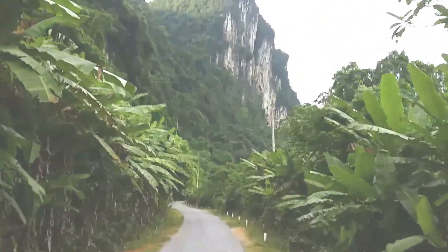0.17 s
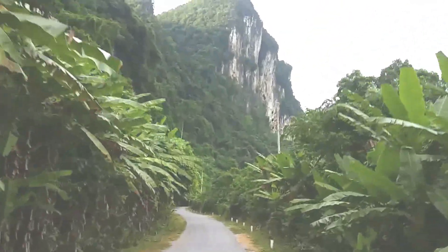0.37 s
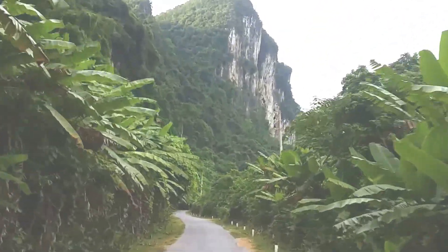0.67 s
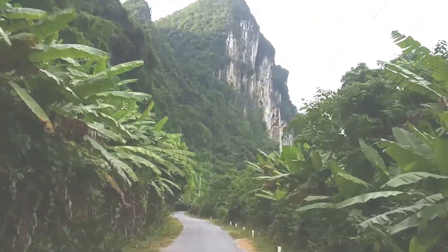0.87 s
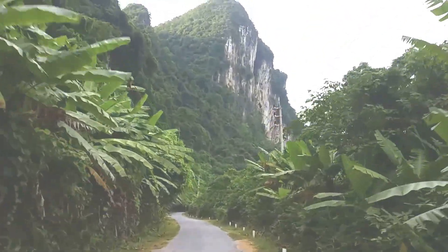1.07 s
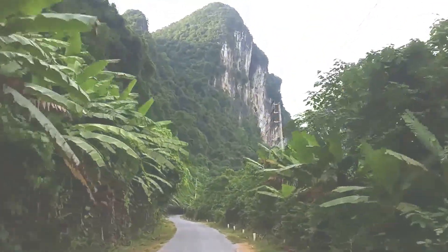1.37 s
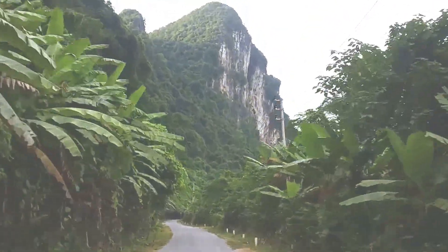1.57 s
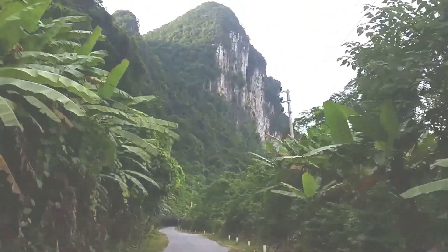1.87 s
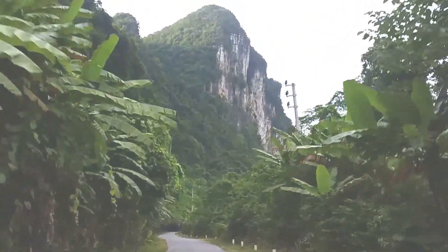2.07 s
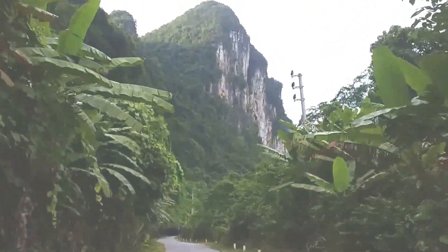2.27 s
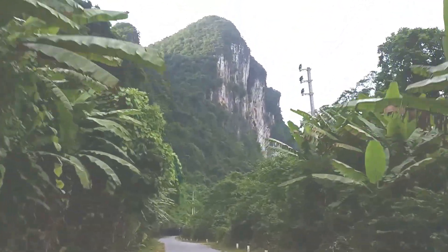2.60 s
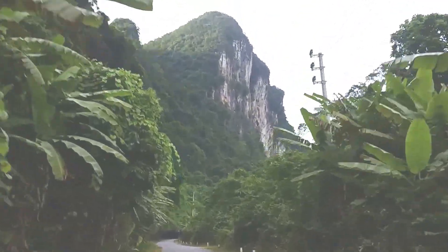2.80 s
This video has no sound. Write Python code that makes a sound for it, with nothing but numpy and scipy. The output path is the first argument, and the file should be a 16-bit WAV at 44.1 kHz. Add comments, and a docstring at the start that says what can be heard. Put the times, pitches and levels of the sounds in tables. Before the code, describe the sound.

Wind buffeting a microphone carried on a small motorbike along a country lane: low thumps, a wavering hollow howl and sharp slaps mostly on the left, with the engine humming steadily higher underneath.

```python
"""A small single-cylinder motorbike pulls away along a country lane; a two-port microphone faces the wind.
From the start eddies buffet each port, thumps hit the left one and a howl wanders over it with sharp slaps.
The firing rate climbs all the while. The howl sinks into a lull after one second, then returns higher,
with the gear whine at its clearest beside it; a tiny tick on the right follows, and the howl and slaps
last to the end. Wind is shaped noise, howl and engine are wavering tones, slaps and thumps are resonances."""
import sys
import numpy as np
from scipy import signal
from scipy.fft import rfft, irfft
from scipy.io import wavfile
from scipy.ndimage import uniform_filter1d, minimum_filter1d

SR = 44100
rng = np.random.default_rng(int(sys.argv[2]) if len(sys.argv) > 2 else 0)


def dump_mix(stems):
    """Bounce the given channels to the path in sys.argv[1] as a 16-bit WAV at rate SR."""
    frames = np.atleast_2d(stems).T  # one column per channel
    limited = np.clip(frames, -1, 1)  # hard clip at full scale
    pcm = np.round(limited * 32767).astype(np.int16)
    wavfile.write(sys.argv[1], SR, pcm)


N = 129654  # length in samples


def amp(db):
    """dB to gain."""
    return 10 ** (np.asarray(db) / 20)


def unit(x):
    """Scale to rms 1."""
    return x / np.sqrt(np.mean(np.abs(x) ** 2) + 1e-20)


def in_time(rows):
    """Columns of a table as curves over all samples; the first column is the time in seconds."""
    seconds, *columns = np.transpose(rows)
    return [np.interp(np.arange(N) / SR, seconds, column) for column in columns]


def at_hz(points, hz):
    """A spectrum read on a log-frequency axis."""
    points = np.array(points)
    return np.interp(np.log(hz), np.log(points[:, 0]), points[:, 1])


def drift(rate_hz):
    """Random wander of rms 1: noise through two equal low-pass poles at rate_hz."""
    step = 20  # computed at every 20th sample, lines between
    r = np.exp(-2 * np.pi * rate_hz * step / SR)
    noise = rng.standard_normal(N // step + 2002)
    slow = signal.lfilter([1], [1, -2 * r, r * r], noise)[2000:]  # drop the settling
    return np.interp(np.arange(N) / step, np.arange(len(slow)), unit(slow))


def noise_through(order, edges_hz, kind):
    """White noise through a Butterworth filter."""
    return smooth(rng.standard_normal(N), order, edges_hz, kind)


def smooth(x, order, edges_hz, kind="low"):
    """Butterworth filter, low-pass unless told otherwise."""
    return signal.sosfilt(signal.butter(order, edges_hz, kind, fs=SR, output="sos"), x)


def ring(start_s, peak_db, hz, t60_s):
    """One click sets a resonance ringing; it falls 60 dB in t60_s."""
    click = np.full(N, 1e-18)
    click[int(start_s * SR)] = amp(peak_db)
    r, w = amp(-60 / (t60_s * SR)), 2 * np.pi * hz / SR
    return signal.lfilter([0, np.sin(w)], [1, -2 * r * np.cos(w), r * r], click)


HOWL_WANDER, WANDER_HZ = 0.0447, 45.3  # pitch spread as a share at full strength, its speed
HOWL_FULL_DB = -18.5  # table level that counts as full strength
HOWL_STEADY = 0.5  # steady part beside the random lumps at full strength; larger when weak
HOWL_WIDTH_HZ, LUMP_DB, LUMP_HZ = 55, .7, 40  # lump speed; extra level wander and its speed
SKIRT_WIDTH_HZ, SKIRT_DB = 400, -2.5  # rough noise around the pitch, level at full strength
ROAR_LUMP_DB, CRACKLE_DB, CRACKLE_HZ = 2, 4.5, 150  # roar shares the lumps and breaks into quick bursts
HOWL_TRIM_DB, ROAR_TRIM_DB, HOWL_RIGHT_DB = 5, 1.5, -38
# Band of the roar. Lower edge, upper edge [Hz].
ROAR_BAND = [530, 1890]
# Overtones of the howl. Each row: multiple of the pitch, level in dB before the lumps and scaling.
OVERTONES = [(2, -20.5), (3, -38), (4, -58)]
# Howl across the left port, into the lull.
# Each row: time in seconds, level in dB before trim, pitch in Hz, broad roar level in dB before trim.
HOWL_TO_LULL = [(0.0, -28, 700, -43), (0.014, -40.5, 672.7, -36), (0.062, -29.5, 594.5, -30.5),
                (0.154, -26.5, 830, -26), (0.19, -33, 844.4, -46), (0.24, -23, 664, -29),
                (0.338, -21.5, 670, -33), (0.36, -22, 673.6, -40), (0.374, -27, 762, -43),
                (0.382, -22, 779, -38), (0.39, -24, 792, -42), (0.438, -24, 802, -45),
                (0.47, -27, 770, -34), (0.487, -28.5, 700, -40), (0.51, -18.5, 610, -44),
                (0.596, -16, 626.4, -43), (0.6, -12, 625, -35), (0.636, -30, 641.4, -43),
                (0.656, -27, 709, -55), (0.692, -66, 687, -26), (0.74, -35, 960, -57.5),
                (0.755, -22, 978, -37), (0.775, -24, 887, -49), (0.79, -20, 760, -44),
                (0.805, -19, 804, -37), (0.82, -18.5, 596.2, -42), (0.84, -22, 720, -42),
                (0.87, -22.5, 735, -37), (0.882, -18.5, 731.4, -51), (0.936, -18, 666, -34),
                (0.948, -13, 686.4, -26.5), (0.995, -20, 720, -30.5), (1.02, -20.5, 909.5, -32),
                (1.044, -31, 920, -42), (1.07, -31, 792.5, -40), (1.178, -37, 610, -38),
                (1.252, -61, 643, -52), (1.268, -25.5, 729, -43), (1.28, -30, 724, -34.5),
                (1.288, -29, 752, -37), (1.376, -74.5, 570, -40), (1.42, -62, 624.7, -34.5)]
# Howl after the lull. Each row: time in seconds, level in dB, pitch in Hz, roar level in dB, as above.
HOWL_FROM_LULL = [(1.44, -70.5, 819, -58), (1.49, -20, 802, -20), (1.536, -40, 931, -41),
                  (1.548, -32, 1050, -49), (1.62, -28.5, 1040, -37), (1.672, -31, 987, -27),
                  (1.694, -43.5, 1008, -57), (1.724, -26.5, 1026, -30), (1.732, -37, 1033, -51),
                  (1.756, -32, 1052, -30), (1.8, -29, 930, -44), (1.836, -30, 1023, -43),
                  (1.85, -25.5, 1023, -35), (1.886, -22.5, 760, -49), (1.9, -38.5, 916, -36),
                  (1.935, -28.5, 1053, -31), (1.957, -21.5, 797, -29.5), (1.975, -23.5, 1026, -33),
                  (2.012, -41, 979.5, -37), (2.028, -26.5, 1017, -29), (2.058, -26, 998, -33),
                  (2.074, -41.5, 990, -43), (2.086, -41, 1080, -32), (2.132, -22.5, 1079, -31.5),
                  (2.224, -30, 1047, -39), (2.238, -42.5, 1134, -54.5), (2.25, -9.5, 1095, -16),
                  (2.266, -25.5, 1066, -41), (2.29, -13.5, 1030, -42), (2.31, -19.5, 832.8, -24.5),
                  (2.325, -19.5, 985, -27), (2.346, -17, 993.5, -33), (2.386, -22.5, 1064, -23),
                  (2.404, -40.5, 1150, -24), (2.412, -25, 1220, -28), (2.418, -41.5, 1151, -40),
                  (2.44, -30, 1089, -46), (2.454, -28.5, 1023, -47), (2.492, -21.5, 907, -26),
                  (2.53, -25.5, 938, -36), (2.58, -21.5, 908.3, -37.5), (2.676, -42.5, 969, -39.5),
                  (2.696, -22.5, 991.4, -27.5), (2.726, -19, 1010, -28), (2.772, -38, 998.4, -29.5),
                  (2.826, -31, 1051, -33), (2.838, -21.5, 1052, -28.5), (2.87, -19.5, 1167, -24),
                  (2.902, -17.5, 1181, -19.5), (2.94, -18.5, 1070, -26)]


def howl():
    """Vortices shed at a wandering rate: a tone in short lumps, rougher when strong, overtones, broad roar."""
    db, hz, roar_db = in_time(list(HOWL_TO_LULL) + list(HOWL_FROM_LULL))
    strength = np.sqrt(np.minimum(amp(db - HOWL_FULL_DB), 1))
    wandering_hz = hz * (1 + HOWL_WANDER * strength * drift(WANDER_HZ))
    phase = 2 * np.pi * np.cumsum(wandering_hz) / SR
    skirt = unit(drift(SKIRT_WIDTH_HZ) * np.sin(phase) + drift(SKIRT_WIDTH_HZ) * np.cos(phase))

    # random lumps move both the size and the phase of the tone
    steady = HOWL_STEADY / np.maximum(strength, .4)
    lumps = unit(steady + drift(HOWL_WIDTH_HZ) + 1j * drift(HOWL_WIDTH_HZ))
    size = np.abs(lumps)
    phase = phase + np.angle(lumps)
    overtones = sum(amp(d) * size ** 2 * np.cos(k * phase) for k, d in OVERTONES)
    tone = size * np.sin(phase) + overtones

    lumpy = drift(LUMP_HZ)
    tone = unit(tone * amp(LUMP_DB * lumpy)) + amp(SKIRT_DB) * strength * skirt
    bursts = amp(ROAR_LUMP_DB * lumpy + CRACKLE_DB * drift(CRACKLE_HZ))
    roar = unit(noise_through(2, ROAR_BAND, "band") * bursts)
    mix = tone * amp(db + HOWL_TRIM_DB) + roar * amp(roar_db + ROAR_TRIM_DB)
    return smooth(mix, 4, 5000) * amp([[0], [HOWL_RIGHT_DB]])


SLAP_T60_S, SLAP_TRIM_DB = 0.018, 5.2
CRACK_HZ, CRACK_T60_S, CRACK_DB = 2400, .002, -5  # bright edge, relative to the slap's table level
# Sudden slaps of air on the left port.
# Each row: start in seconds, peak in dB before trim and softening, pitch in Hz.
AIR_SLAPS = [(0.367, -1.5, 706), (0.491, -4.5, 670), (0.529, -3, 631.6), (0.945, -10, 1296),
             (1.474, -8.5, 767), (1.489, -17, 800), (2.157, -18, 1004), (2.249, -5, 1130), (2.255, -4, 756),
             (2.284, -1.5, 1000), (2.4107, -1.5, 1273), (2.413, -8, 597.4), (2.797, -11, 1091),
             (2.831, -12.5, 1062), (2.872, -14, 3229), (2.895, -18.5, 3585)]


def slaps():
    """Each slap of air rings the left port briefly at its own pitch, with a bright cracking edge."""
    bodies = sum(ring(s, db + SLAP_TRIM_DB, hz, SLAP_T60_S) for s, db, hz in AIR_SLAPS)
    cracks = sum(ring(s, db + CRACK_DB, CRACK_HZ, CRACK_T60_S) for s, db, hz in AIR_SLAPS)
    return smooth(bodies + cracks, 2, 4000)


THUMP_CYCLES, THUMP_SOFT_HZ = 6.0, 300  # cycles to fall 60 dB, low-pass that softens the push
# Single large eddies on the left port.
# Each row: start in seconds, peak in dB before softening, pitch in Hz.
EDDY_THUMPS = [(.06, -5, 130), (0.281, -2, 170), (0.337, -13, 119), (0.431, -6, 171.4), (0.68, -11, 140),
               (1.525, -3.5, 199.4), (1.675, -18, 171.4), (1.795, -24, 110.2), (1.845, 0, 100.1),
               (1.935, -8, 128.9), (1.993, -0.5, 220), (2.074, 0, 102.2), (2.206, -4, 100),
               (2.415, -4.5, 130), (2.856, -10.5, 170), (2.883, -2.5, 181.2)]


def thumps():
    """Single large eddies push the left port: soft low resonances of a few cycles."""
    pushes = sum(ring(s, db, hz, THUMP_CYCLES / hz) for s, db, hz in EDDY_THUMPS)
    return smooth(pushes, 2, THUMP_SOFT_HZ)


FLUTTER_DB, FLUTTER_HZ = 1, 83  # quick flutter shared by all bands of a port
# Flicker of the noise bands. Each row: band centre in Hz, depth in dB before the drifts' own weights.
FLICKER_DEPTH = [(60, -0.5), (400, 0.5), (2000, 0.5), (12000, 0.26)]


def port_noise(spectrum, buffet_db, hiss_db, top_db, top_hz):
    """Turbulence on one port in overlapping bands; the bass follows the buffeting, the treble the hiss."""
    hz = np.maximum(np.arange(N // 2 + 1) * SR / N, 1)
    below = np.minimum(hz / spectrum[0][0], 1) ** 2  # fade under the lowest point
    shaped = rfft(rng.standard_normal(N)) * amp(at_hz(spectrum, hz)) * below * np.sqrt(SR / 2)
    out, together = 0, drift(4.3)
    flutter = FLUTTER_DB * drift(FLUTTER_HZ)
    for centre in 20 * 2 ** np.arange(0, 10.5, .5):  # half-octave steps
        away = np.clip(2 * np.log2(hz / centre), -1, 1)
        band = irfft(shaped * np.cos(away * np.pi / 2) ** 2, N)
        bass = 1 / (1 + (centre / top_hz) ** 2)  # share led by the buffeting
        flicker = at_hz(FLICKER_DEPTH, centre) * (.5 * together + 3.5 * drift(32))
        level_db = bass * buffet_db + (1 - bass) * hiss_db + (centre > 8000) * top_db
        out = out + band * amp(level_db + flicker + flutter)
    return out


# Buffeting in the bass; only the movement about each column's mean is used.
# Each row: time in seconds, level in dB, lean to the left in dB before each port's share.
BUFFETING = [(0.0, -20, 14), (0.47, -18, 13), (0.61, -18, 14), (0.77, -19, -5), (0.82, -24.5, 6),
             (0.92, -20.5, 3), (0.97, -28, 22), (1.02, -19.5, 6), (1.14, -24.5, -5), (1.2, -19, 24),
             (1.27, -27, 0), (1.75, -16.5, 10.5), (1.78, -23, -6), (1.85, -13.5, 18), (1.88, -19, 11),
             (2.1, -14.5, 20.5), (2.17, -18, 3), (2.25, -16, 25.5), (2.36, -19, -5), (2.44, -15, 27),
             (2.57, -22.5, -8.5), (2.79, -16, 7.5), (2.9, -13.5, 24), (2.94, -29, 15)]
# Crossover where the noise passes from buffeting to hiss. Left port, right port [Hz].
CROSSOVER = [530, 876]
# Left port's wind noise with its cavity peak. Each row: frequency in Hz, density in dB per Hz before movement.
LEFT_SPECTRUM = [(25, -63), (50, -43.5), (80, -48.5), (130, -43.5), (200, -42.5), (320, -49.5),
                 (500, -52.5), (800, -56.5), (1300, -61), (2000, -67.5), (3200, -67), (4200, -70.5),
                 (5200, -70.5), (6300, -63.5), (7000, -71), (8500, -91.5), (10000, -95.5), (12000, -93),
                 (15500, -104.0)]
# Right port's wind noise with its cavity peak. Each row: frequency in Hz, density in dB per Hz before movement.
RIGHT_SPECTRUM = [(22, -68), (35, -54), (55, -66), (80, -43), (130, -48.5), (200, -51), (320, -55.5),
                  (500, -61.5), (800, -65.5), (1300, -71.5), (2200, -76), (3700, -81.5), (5000, -87),
                  (7000, -96), (8500, -99.5), (10000, -93), (11800, -89), (13500, -98), (15500, -101)]


def wind(hiss_db, top_db):
    """Eddies buffet the two ports separately: unrelated noise with its own spectrum on each."""
    db, lean = in_time(BUFFETING)
    db, lean = db - db.mean(), lean - lean.mean()
    left = port_noise(LEFT_SPECTRUM, db + 0.055 * lean, hiss_db, top_db, CROSSOVER[0])
    right = port_noise(RIGHT_SPECTRUM, db - 0.67 * lean, hiss_db, top_db, CROSSOVER[1])
    return np.array([left, right])


# Treble hiss. Each row: time in seconds, level in dB (only its movement about the mean is used),
# extra in dB for bands centred above 8 kHz.
HISS_LEVEL = [(0, -31.5, 3.5), (.15, -32.5, 4.5), (.3, -34.5, 5), (.5, -31.5, 2.5), (.53, -39.5, 5),
              (.62, -39, 3), (.7, -35, 3.5), (.92, -37, 2), (.94, -44, 0), (1.0, -45.5, 2),
              (1.04, -40, 1.5), (1.7, -37.5, 1), (1.87, -39, 2), (2.0, -35.5, 0.5), (2.21, -36, 1),
              (2.24, -41.5, 1), (2.33, -38, -1), (2.45, -39.5, -0.5), (2.62, -36, -2), (2.8, -39, -0.5),
              (2.85, -41, -1), (2.94, -41.5, -6)]


def hiss_movement():
    """Rise and fall of the hiss about its mean, and the extra for the top bands, both in dB."""
    hiss_db, top_db = in_time(HISS_LEVEL)
    return hiss_db - hiss_db.mean(), top_db


FIRING_START, ENGINE_LAG_S = 2.4, .0004  # radians into the cycle; later on the right
ENGINE_WAVER_DB, ENGINE_RIGHT_DB = 1.3, -5.5
ENGINE_FOLLOWS = .8  # share of the hiss movement that the engine level takes on
PUFF_DB = -33  # before the 3 dB lift shared with the partials
GEAR_TEETH, GEAR_RIGHT_DB = 23.22, -9  # gear teeth per firing
# Band of the exhaust puffs. Lower edge, upper edge [Hz].
PUFF_BAND = [70, 280]
# Firing rate of the engine. Each row: time in seconds, rate in Hz.
FIRING_RATE = [(0, 33.55), (.5, 35.15), (1.0, 36.95), (1.25, 37.3), (1.6, 38.55), (2.0, 39.2), (2.5, 40.25),
               (2.94, 40.95)]
# Engine partials. Each row: multiple of the firing rate, rms level in dB at the start and at the end,
# before the waver and the hiss movement.
PARTIALS = [(2, -29.5, -23.5), (3, -35, -37), (4, -24.5, -31), (5, -23.5, -34), (6, -36, -39),
            (8, -38, -42), (10, -41, -43), (11, -41, -45)]
# Gear whine. Each row: time in seconds, peak level in dB before its waver.
GEAR_WHINE = [(0, -44), (.5, -40), (.75, -36), (1.0, -50), (1.5, -50), (1.55, -30), (2.05, -29.5),
              (2.24, -30), (2.3, -39), (2.94, -46)]


def bike(hiss_db):
    """Exhaust beats as wavering partials of the firing rate, a noisy puff each firing, and the gear whine."""
    rate, = in_time(FIRING_RATE)
    phase = FIRING_START + 2 * np.pi * np.cumsum(rate) / SR
    along = np.arange(N) / N
    beats = 0
    for k, start_db, end_db in PARTIALS:
        level_db = start_db + (end_db - start_db) * along + ENGINE_WAVER_DB * drift(4)
        beats = beats + amp(level_db) * np.sin(k * phase + .2 * drift(3))
    puffs = noise_through(2, PUFF_BAND, "band") * (1 + np.cos(phase)) ** 2
    beats = beats + amp(PUFF_DB) * unit(puffs)
    beats = np.array([beats, np.roll(beats, int(ENGINE_LAG_S * SR))])
    # the root of two turns the partials' peak levels into rms levels
    engine = np.sqrt(2) * beats * amp(ENGINE_FOLLOWS * hiss_db) * amp([[0], [ENGINE_RIGHT_DB]])

    gear_db, = in_time(GEAR_WHINE)
    whine = amp(gear_db + 1.2 * drift(8)) * np.sin(GEAR_TEETH * phase + .3 * drift(10))
    return engine + whine * amp([[0], [GEAR_RIGHT_DB]])


TICK_HZ, TICK_T60_S = 11800, 0.0044
# Small tick on the right port. Each row: start in seconds, peak in dB.
RIGHT_TICKS = [(2.271, -28)]


def ticks():
    """A tick rings the right port's cavity."""
    return sum(ring(s, db, TICK_HZ, TICK_T60_S) for s, db in RIGHT_TICKS)


def scene():
    """Howl, hits on the left and right port, wind and bike."""
    hiss_db, top_db = hiss_movement()
    hits = np.array([slaps() + thumps(), ticks()])
    return howl() + hits + wind(hiss_db, top_db) + bike(hiss_db)


LIMIT, LIMIT_S, CUTOFF_HZ = .9, .004, 15700  # peak ceiling, look-ahead, top of the sound


def record(dry):
    """A quick look-ahead limiter shared by both channels holds the peaks; then the top is cut."""
    span = int(LIMIT_S * SR)
    gain = np.minimum(1, LIMIT / (np.abs(dry).max(axis=0) + 1e-9))
    gain = uniform_filter1d(minimum_filter1d(gain, size=2 * span + 1), size=span)
    top_cut = signal.ellip(14, .5, 90, CUTOFF_HZ, fs=SR, output="sos")
    return signal.sosfilt(top_cut, dry * gain)


dry = scene()
out = record(dry)
dump_mix(out)
```